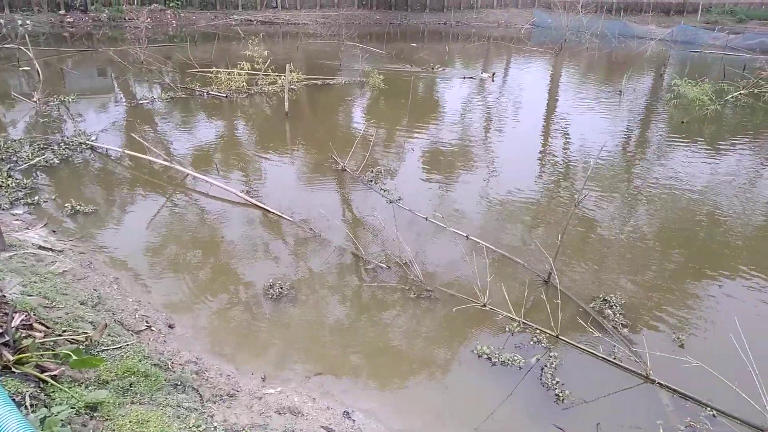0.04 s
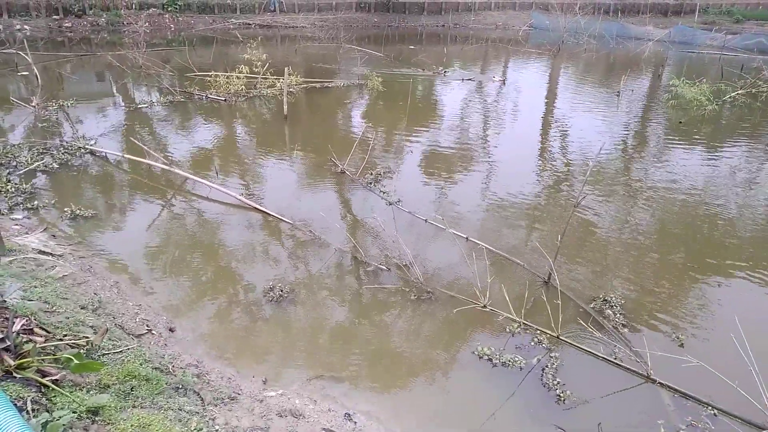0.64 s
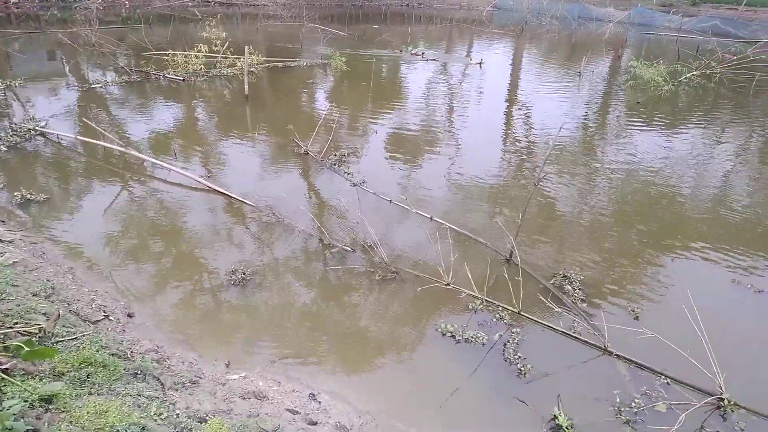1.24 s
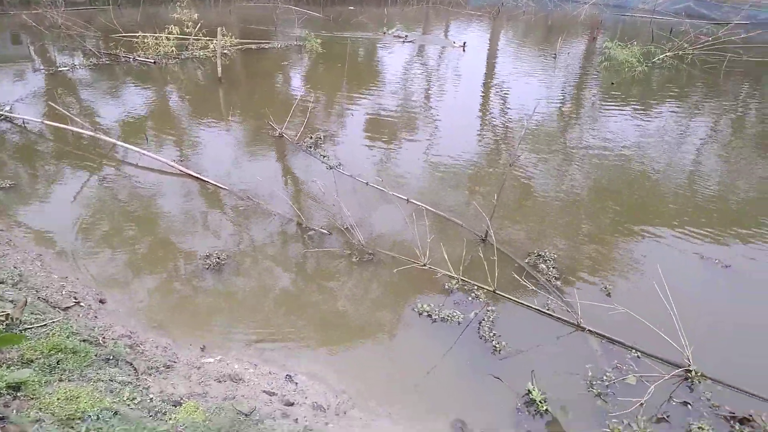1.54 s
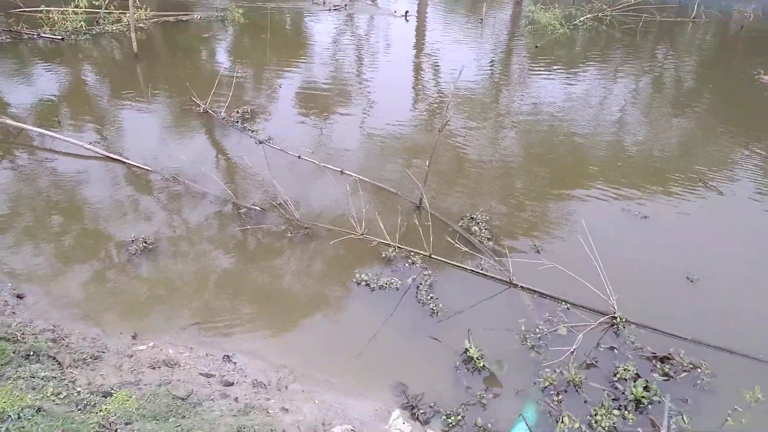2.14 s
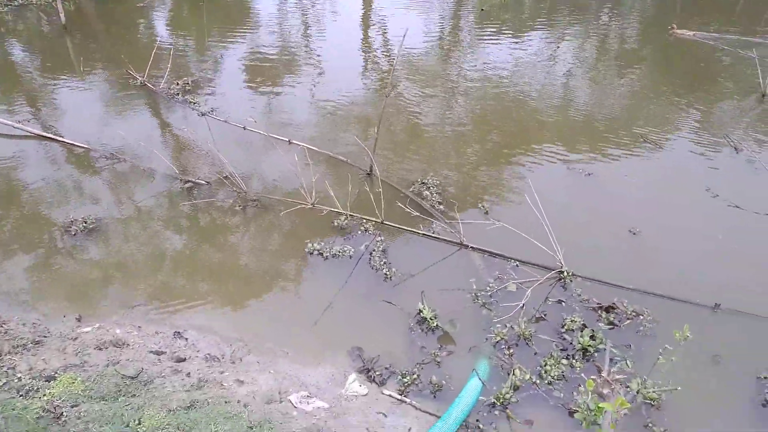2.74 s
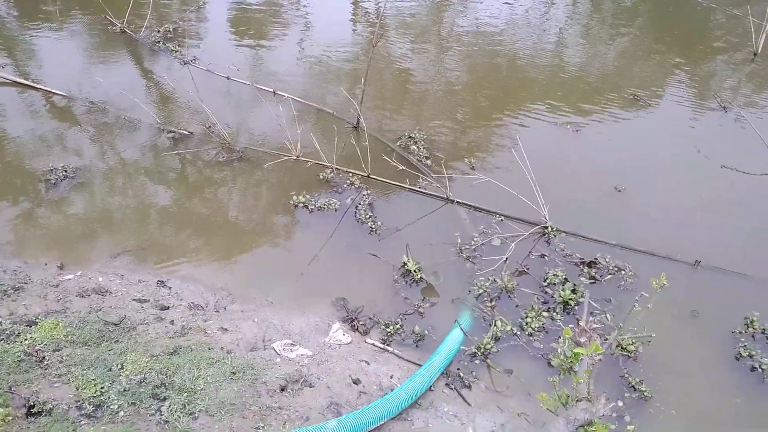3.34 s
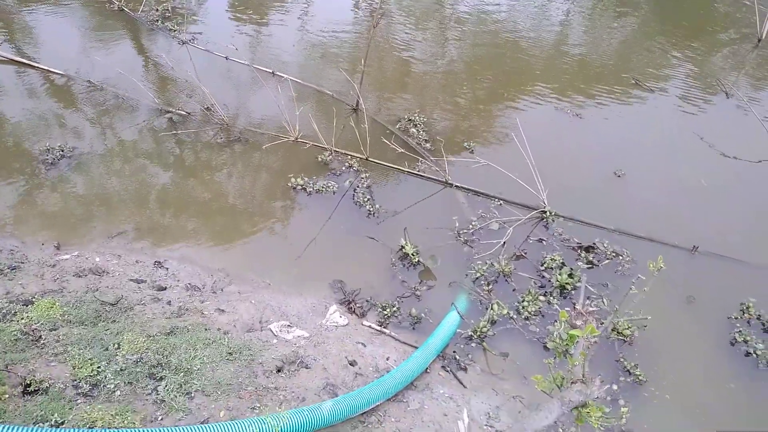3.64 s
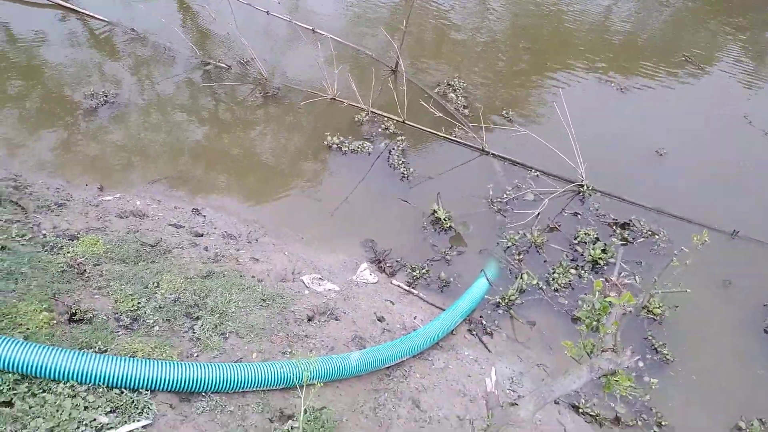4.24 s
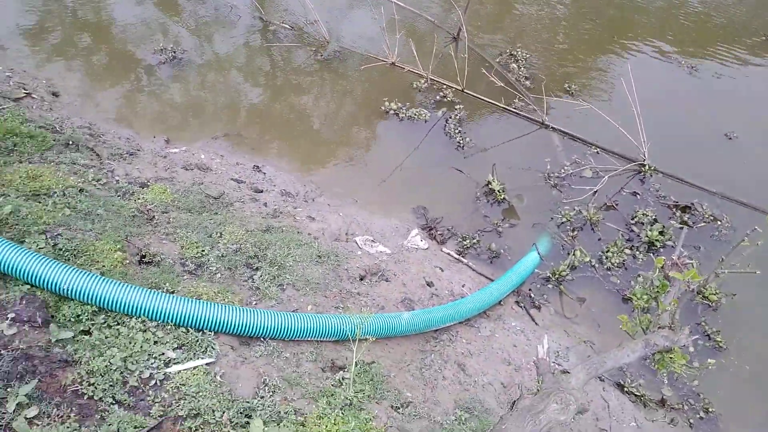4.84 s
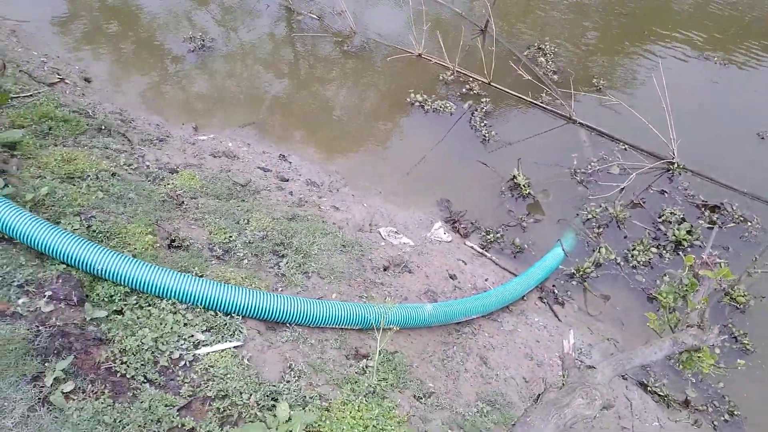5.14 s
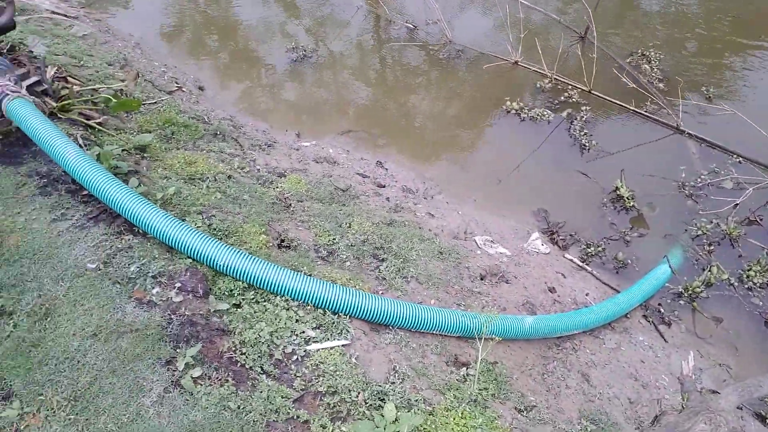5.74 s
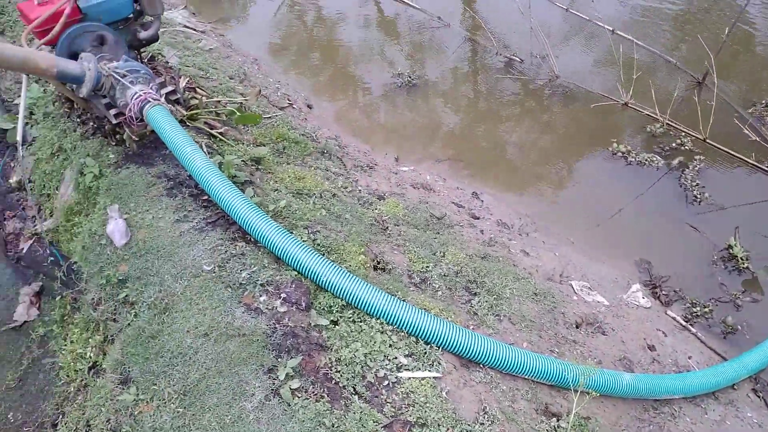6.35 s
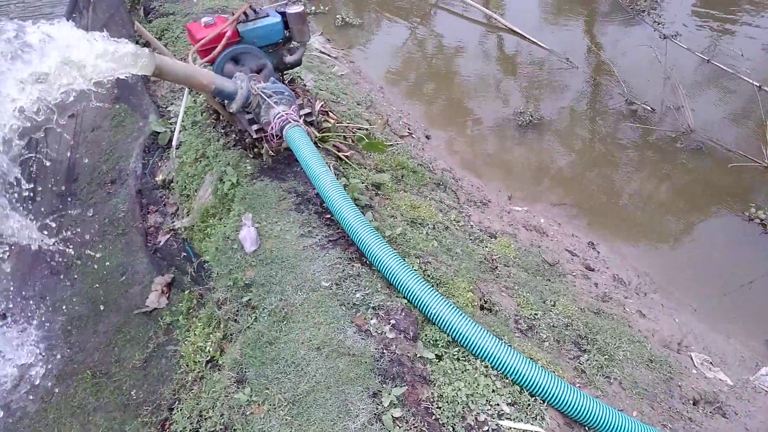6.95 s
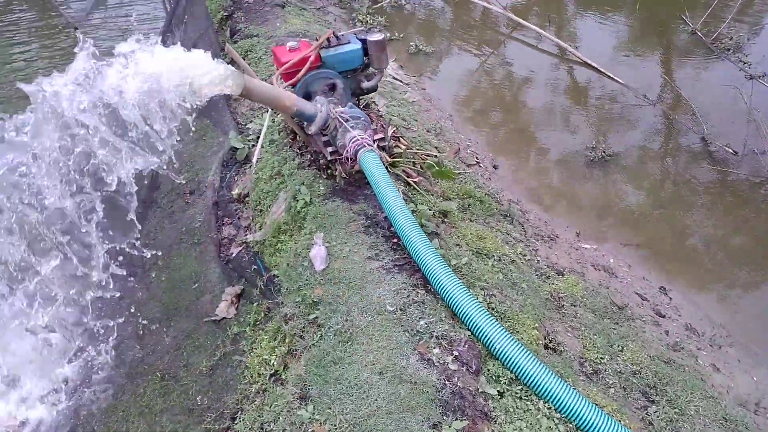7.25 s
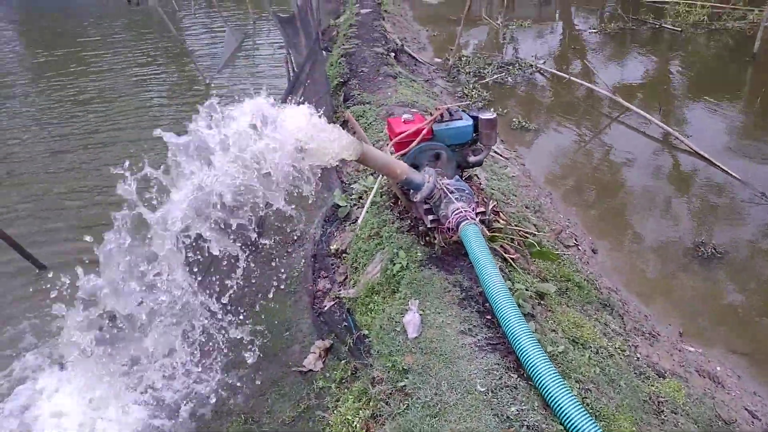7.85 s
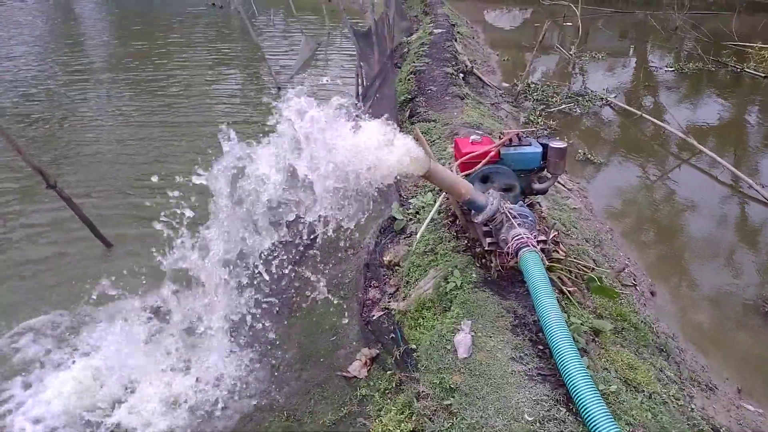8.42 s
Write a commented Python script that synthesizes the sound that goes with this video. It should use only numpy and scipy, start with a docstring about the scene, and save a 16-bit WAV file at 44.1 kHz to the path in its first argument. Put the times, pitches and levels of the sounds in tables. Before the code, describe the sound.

A pump's water jet pours into a pond with a continuous, seething splash full of drops and bubbles. Beside it a diesel engine runs at a fast, even beat, thudding and clattering without a break. Soft gusts of open-air wind brush the microphone early on and more strongly later. As the microphone turns to face the pump, the sound shifts from the right towards the middle and the water's gulping roar comes forward.

```python
"""A single-cylinder diesel chugs on a pond bank, about eleven firings a second, driving a pump whose
jet crashes into the water. Each cycle is a combustion knock, an exhaust puff and valve clatter; the jet
is a seething hiss full of splats, drops and bubbles. The stereo microphone sits in a hand-held camera
that turns slowly towards the pump, so its left port lags less and less and changes colour.
A light breeze brushes both ports."""
import sys
import numpy as np
from scipy import signal
from scipy.fft import rfft, irfft, next_fast_len
from scipy.io import wavfile
from scipy.ndimage import uniform_filter1d, map_coordinates

SR = 44100
rng = np.random.default_rng(int(sys.argv[2]) if len(sys.argv) > 2 else 0)


def master(y):
    """Save y as 16-bit WAV."""
    cut = np.clip(np.atleast_2d(y).T, -1, 1)
    pcm = np.round(cut * 32767)  # scale
    wavfile.write(sys.argv[1], SR, pcm.astype(np.int16))


N = 378378

# the turn towards the pump, at the left port: time_s, lag_ms, reflection_ms, housing_phase_scale
TURN = [(0, 0.45, 0.082, 0.9), (1.7, 0.46, 0.072, 0.68), (2.8, 0.47, 0.056, 0.66), (4.2, 0.46, 0.077, 0.65),
        (5.1, 0.5, 0.11, 1.22), (6.7, 0.47, 0.13, 1.53), (7.25, 0.28, 0.13, 0.66), (7.8, 0.21, 0.15, 0.42),
        (8.58, 0.13, 0.16, 0.37)]


def amp(db):
    """Decibels to gain."""
    return 10 ** (np.asarray(db) / 20)


def unit(x):
    """Scale to rms 1."""
    return x / np.sqrt(np.mean(x ** 2) + 1e-20)


def along(points, hz):
    """(freq_hz, value) points read on a log axis."""
    freqs, values = np.transpose(points)
    return np.interp(np.log(hz + 1), np.log(freqs + 1), values)


def curves(rows):
    """One value per sample for each column after the time."""
    time_s, *columns = np.transpose(rows)
    return [np.interp(np.arange(N) / SR, time_s, column) for column in columns]


def swells(rows):
    """A curve of bell-shaped swells from (centre_s, half_length_s, height) rows."""
    t = np.arange(N) / SR
    return sum(height * np.exp(-((t - s) / half) ** 2) for s, half, height in rows)


def wobble(rate):
    """A smooth random curve, rate knots a second."""
    return map_coordinates(rng.standard_normal(int(N * rate / SR) + 4), [np.arange(N) * rate / SR])


def filtered(x, response):
    """x times a complex response of frequency."""
    size = next_fast_len(N + SR // 2)
    return irfft(rfft(x, size) * response(np.fft.rfftfreq(size, 1 / SR)), size)[..., :N]


def coloured(x, spectrum):
    """x shaped by (freq_hz, level_db) points, at rms 1."""
    return unit(filtered(x, lambda hz: amp(along(spectrum, hz))))


def placed(start_samples, sounds):
    """Mix the rows of sounds, each from its own start."""
    at = start_samples.astype(int)[:, None] + np.arange(sounds.shape[1])
    return np.bincount(at.ravel(), sounds.ravel(), N)[:N]


def repeated(times, shape, scatter_db):
    """The shape started at each time, its strength varying by scatter_db."""
    sizes = amp(scatter_db * rng.standard_normal(len(times)))
    train = np.bincount(np.round(np.abs(times) * SR).astype(int), sizes, N)[:N]
    return signal.fftconvolve(train, shape)[:N]


def facing(side_on_lag_ms=0.56):
    """0 with the pump at the microphone's side, 1 with it straight ahead."""
    return 1 - curves(TURN)[0] / side_on_lag_ms


def breeze(calm_db=-54.8, flutter_db=-17, own_db=4, left_db=-1.5):
    """Gusts buffet the ports, the sheltered left one less; the strongest add a higher flutter."""
    # gusts over the calm: centre_s, half_length_s, buffet_rise_db, flutter_rise_db
    gusts = [(.12, .12, 8, 0), (.92, .3, 8.5, 9), (1.2, .11, 7, 9), (1.72, .09, 8.5, 10),
             (5.88, .3, 10.5, 19), (6.03, .06, 0, 8), (6.25, .15, 13.5, 26), (6.55, .05, 10, 8),
             (6.98, .13, 11.5, 20), (7.33, .13, 9, 10), (7.92, .05, 11, 16), (8.33, .06, 11, 16)]
    # spectra of the wind on the ports: freq_hz, density_db
    buffet_spectrum = [(12, -21), (35, 4.5), (70, 1.5), (170, -5), (350, -27), (900, -60)]
    flutter_spectrum = [(40, -17), (95, 0), (150, 4), (220, -3), (330, -13), (700, -45)]
    gust_db = swells([(s, half, db) for s, half, db, _ in gusts])
    whip_db = swells([(s, half, db) for s, half, _, db in gusts])
    air = rng.standard_normal(N) + amp(own_db) * rng.standard_normal((2, N))  # shared + each port's own
    buffet = unit(amp(1.2 * wobble(12)) * coloured(air, buffet_spectrum))
    flutter = unit(amp(2 * wobble(58)) * coloured(rng.standard_normal((2, N)), flutter_spectrum))
    wind = amp(gust_db) * buffet + amp(flutter_db + whip_db) * flutter
    return amp(calm_db) * wind * np.array([[amp(left_db)], [1]])


def bubbles(count=2200, centre_hz=1100, spread=0.634, decay_cycles=7, glide=0.14, sizes_db=1.9):
    """Trapped air rings briefly, rising in pitch as it nears the surface."""
    when, pitch, size = rng.random(count), rng.standard_normal(count), rng.exponential(size=count)
    pitch_hz = np.clip(centre_hz * np.exp(spread * pitch), 350, 6000)
    cycles = pitch_hz[:, None] * np.arange(SR // 50) / SR
    age = cycles / decay_cycles
    envelope = amp(sizes_db * np.minimum(size, 4))[:, None] * np.exp(-age) * (1 - np.exp(-cycles))
    tone = np.sin(2 * np.pi * cycles * (1 + glide * np.tanh(age / 2)))
    return unit(placed(when * N, envelope * tone))


def plunge(gain_db=-21.5, ahead_db=9, gulps_db=2):
    """The jet drives air under water: a gulping roar that comes forward as the microphone faces it."""
    # roar of the submerged air: freq_hz, density_db
    roar_spectrum = [(200, -23), (420, -5), (750, 5), (1000, -9), (1400, 0), (2000, -20), (4000, -40)]
    roar = unit(amp(gulps_db * wobble(70)) * coloured(rng.standard_normal(N), roar_spectrum))
    return amp(gain_db + ahead_db * facing()) * roar


def splats(count=2600, centre_hz=3800, spread=0.49, width_hz=1000, decay_s=0.0039, sizes_db=3.0):
    """Lumps of water smack the surface in quick succession, each a short burst of its own colour."""
    when, pitch = rng.random(count), rng.standard_normal((count, 1))
    size = rng.exponential(size=(count, 1))
    length = SR // 50
    hz = np.fft.rfftfreq(length, 1 / SR)
    colour = np.exp(-((hz - centre_hz * np.exp(spread * pitch)) / width_hz) ** 2)
    bursts = irfft(rfft(rng.standard_normal((count, length))) * colour, length)
    envelope = amp(sizes_db * np.minimum(size, 4)) * np.exp(-np.arange(length) / SR / decay_s)
    return unit(placed(when * N, bursts * envelope))


def drops(count=26000, spread_db=3.5):
    """Sharp impacts of spray, mostly small and a few large."""
    when, size, sign = rng.random((count, 3)).T
    strength = amp(-spread_db * np.log(np.maximum(size, .03))) * np.sign(sign - .5)
    return unit(np.bincount((when * N).astype(int), strength, N))


def splash(spray_db=-2, patchy_db=1.6, alike_below_hz=7000):
    """A patchy hiss of spray, spread so wide on the pond that its treble differs from port to port."""
    # the jet striking the pond: freq_hz, density_db
    hiss_spectrum = [(40, -45), (120, -8.5), (280, -8), (450, -13), (800, -7.5), (1500, -13), (2450, -3.5),
                     (2950, -10), (3800, -8.5), (4800, -6), (6200, -5.5), (7600, 0.5), (8500, -2),
                     (10000, -5), (12000, -11), (14300, -14)]
    # likeness of the splash at the two ports: freq_hz, coherence
    likeness = [(100, 1), (700, 1), (2000, 0.092), (3300, 0.18), (5000, 0.019), (8000, 0.016),
                (12000, 0.031)]
    spray = np.array([drops(), drops()])
    hz, t, spectra = signal.stft(rng.standard_normal((2, N)) + amp(spray_db) * spray, SR, nperseg=512)
    patches = uniform_filter1d(rng.standard_normal(spectra.shape[1:]), size=14, axis=0)
    patches = unit(uniform_filter1d(patches, size=7, axis=1))
    # for a moment the whole splash lies in line with the ports and they hear it more alike
    in_line = np.interp(t, np.arange(N) / SR, swells([(5.9, 0.61, 1)]))
    gathered = np.outer(1 / (1 + (hz / alike_below_hz) ** 4), in_line)
    coherence = 1 - (1 - along(likeness, hz))[:, None] * (1 - gathered)
    angle = np.arccos(np.clip(coherence, 0, 1)) / 2
    spectra = spectra * amp(patchy_db * patches) * np.array([np.cos(angle), np.sin(angle)])
    mid, side = signal.istft(spectra, SR, nperseg=512)[1][:, :N]
    return coloured(np.array([mid + side, mid - side]), hiss_spectrum)


def surging(water, churn_db=.3, slap_db=.8, lull_db=-2.5, rush_share=.45, spray_above_hz=4000):
    """The jet churns, thins and drops slugs; the spray follows fully, the deeper rush only in part."""
    # the heaviest slugs of water: centre_s, rise_db
    heavy_slugs = [(.04, 2.5), (.15, 2.5), (.54, 1.5), (.84, 3.2), (.98, 2), (1.85, 1.8), (3.04, 1.5),
                   (3.86, 2.5), (4.39, 1.5), (4.53, 2), (5.02, 2.5), (5.18, 2), (6.86, 1.5), (6.96, 3),
                   (7.25, 1.5), (7.8, 2.2), (8.45, 1.7)]
    # moments when the jet thins: centre_s
    thin_moments = [.63, 1.38, 1.98, 4.68, 5.12, 5.28, 6.2, 6.41, 6.6, 7.34]
    slugs = swells([(s, 0.016, db) for s, db in heavy_slugs])
    lulls = swells([(s, 0.037, lull_db) for s in thin_moments])
    surge_db = slugs + lulls + churn_db * wobble(16) + slap_db * wobble(55)
    rush = filtered(water, lambda hz: 1 / (1 + (hz / spray_above_hz) ** 4))
    return amp(surge_db) * (water - rush) + amp(rush_share * surge_db) * rush


def jet(gain_db=-42, splash_db=8.5, splats_db=-5, bubbles_db=-10.5, ahead_db=5.0):
    """Water slaps the pond unevenly and bursts into spray and foam, which bubbles louder on axis."""
    # the gush swells as the microphone comes round to it: centre_s, half_length_s, rise_db
    fuller = [(7.15, 0.38, 0.4)]
    impacts = amp(splash_db) * splash() + amp(splats_db) * splats()
    foam = amp(bubbles_db + ahead_db * facing()) * bubbles()
    return amp(gain_db + swells(fuller)) * surging(impacts + foam + plunge())


def firings(offset_cycles=.407):
    """Ignition times in seconds: one for every two turns of the crank."""
    # engine speed: time_s, firings_per_s
    speed = [(0.0, 11.222), (0.7, 11.143), (1.1, 11.232), (1.55, 11.174), (1.85, 11.34), (2.2, 11.383),
             (2.6, 11.325), (3.1, 11.304), (3.6, 11.157), (4.1, 11.199), (4.6, 11.209), (5.1, 11.314),
             (5.6, 11.255), (6.2, 11.283), (6.7, 11.269), (7.1, 11.247), (7.6, 11.345), (8.58, 11.319)]
    cycles = np.cumsum(curves(speed)[0]) / SR - offset_cycles
    return np.interp(np.arange(int(cycles[-1]) + 1), cycles, np.arange(N) / SR)


def frame(times, level_db=-50.0, attack_s=0.0018):
    """Piston reversals and the closing intake set the frame droning."""
    # low thuds of the piston and valves: after_ignition_s, level_db
    thuds = [(.0055, 4), (0.0268, 10), (0.0471, 11), (0.069, 20)]
    # ringing of the frame and air intake: pitch_hz, level_db, t60_s
    modes = [(141.6, 5, 0.008), (180, -12, .12), (226, -8.5, 0.28), (272, -1, 0.11), (302, -4.5, .09),
             (484, -12.5, 0.06)]
    t = np.arange(SR // 5) / SR
    ring = sum(amp(db - 60 * t / t60) * np.sin(2 * np.pi * hz * t) for hz, db, t60 in modes)
    ring *= 1 - np.exp(-t / attack_s)
    drone = sum(amp(db) * repeated(times + delay, ring, scatter_db=0.1) for delay, db in thuds)
    return -amp(level_db) * unit(drone)


def clatter(times, ring_db=-44, tick_db=-46, gears_db=-18, rise_s=.0007):
    """Diesel knock and valve gear: short rattling bursts ring the block over a steady gear grind."""
    # metal contacts in each cycle: after_ignition_s, decay_s, block_db, bright_db
    contacts = [(.002, .005, -4, 2), (.0225, .003, -7, 3.5), (.0472, .0025, -7, -8),
                (.0705, .0025, -20, -3)]
    # resonances of the engine block: centre_hz, width_hz, level_db
    resonances = [(450, 380, -2), (1240, 350, 8.5), (1630, 610, 4), (2580, 620, 1.5), (3780, 310, 1)]
    # valve ticks: freq_hz, density_db
    tick_spectrum = [(1200, -19), (2500, -19.5), (4000, 5), (8000, 15), (11000, -17), (14000, -33.5)]
    t = np.arange(SR // 12) / SR
    rattle, tick = amp(gears_db), 0
    for delay, decay, block_db, bright_db in contacts:
        burst = repeated(times + delay, np.exp(-t / decay) * (1 - np.exp(-t / rise_s)), scatter_db=0)
        rattle = rattle + amp(block_db) * burst
        tick = tick + amp(bright_db) * burst
    block = lambda hz: sum(
        (-1) ** k * amp(db) * 1j * hz * width / (centre ** 2 - hz ** 2 + 1j * hz * width)
        for k, (centre, width, db) in enumerate(resonances))
    body = unit(filtered(rattle * rng.standard_normal(N), block))
    return amp(ring_db) * body + amp(tick_db) * coloured(tick * rng.standard_normal(N), tick_spectrum)


def pings(times, blows, modes, slack_s=.00025, detune=.011, scatter_db=2, rise_cycles=3):
    """Steel struck in every cycle; play in the bearings varies each ping's time, pitch and strength."""
    t = np.arange(SR // 20) / SR
    out = np.zeros(N)
    for delay, blow_db in blows:
        starts = np.abs(times + delay + slack_s * rng.standard_normal(len(times)))
        rings = 0
        for hz, db, t60 in modes:
            pitch, size, phase = rng.standard_normal((3, len(times), 1))
            envelope = amp(db + scatter_db * size - 60 * t / t60) * (1 - np.exp(-t * hz / rise_cycles))
            rings = rings + envelope * np.sin(2 * np.pi * (hz * (1 + detune * pitch) * t + phase))
        out += amp(blow_db) * placed(starts * SR, rings)
    return out


def knock(times):
    """Combustion cracks against the head, the piston slaps its liner and the valve gear clicks."""
    # blows in each cycle: after_ignition_s, level_db
    ignition = [(.0005, 0)]
    piston_slaps = [(.0038, -2), (.0245, -1), (.0505, -1)]
    rocker_taps = [(.0228, 0), (.0645, -7)]
    valve_seating = [(.0474, 1)]
    # ringing of the parts they strike: pitch_hz, level_db, t60_s
    head_modes = [(1050, -32.5, .028), (1150, -30, .036), (1245, -33, .025), (1340, -34, .028),
                  (1460, -36.5, .03), (1720, -28, .008), (2050, -37, .025), (2660, -32.5, .035),
                  (3630, -32.3, .036), (5450, -42, .03), (6500, -39, .03)]
    liner_modes = [(500, -45, .02), (700, -41, .025), (790, -42, .03), (1090, -35, .052)]
    rocker_modes = [(2530, -35, .032), (3165, -35.5, .036)]
    valve_modes = [(3650, -29.5, .012), (4200, -34, .011), (4800, -39, .012)]
    return (pings(times, ignition, head_modes) + pings(times, piston_slaps, liner_modes)
            + pings(times, rocker_taps, rocker_modes) + pings(times, valve_seating, valve_modes))


def exhaust(times, level_db=-41.5, opens_s=.0204, lasts_s=.0079, muffle_hz=305, leak_hz=26):
    """The valve lets out one lopsided puff of gas a cycle; its start and its end radiate most."""
    progress = np.minimum(np.arange(SR // 50) / SR / lasts_s, 1)
    puff = np.sin(np.pi * progress) * (.5 + progress)
    flow = repeated(times + opens_s, puff, scatter_db=0.75)
    # the small outlet radiates little bass and the silencer rounds off the edges
    outlet = lambda hz: -hz ** 2 * np.exp(-(hz / muffle_hz) ** 2) * 1j * hz / (leak_hz + 1j * hz)
    # part of each puff comes back 6.6 ms later
    echo = lambda hz: 1 + .19 * np.exp(-2j * np.pi * hz * .0066)
    return amp(level_db) * unit(filtered(flow, lambda hz: outlet(hz) * echo(hz)))


def ports(pair, reflect_per_khz=0.13, reflect_most=0.26, dull_above_hz=9300):
    """The left port hears the pump late, with a reflection off camera and hand whose notches slide."""
    # colour of the left port with the pump at the side: freq_hz, gain_db
    side_colour = [(130, 1.3), (500, -1), (900, 0.6), (2000, 5.5), (2600, 3), (3500, 0.05), (5200, 3),
                   (7400, 0.2), (8500, 4.5), (9500, 3.5), (11000, 8), (13500, 13.5)]
    # change of that colour with the pump straight ahead: freq_hz, gain_db
    ahead_change = [(500, -2), (900, -2.5), (2200, -9), (3400, 3.5), (4700, -4), (8500, -2), (13000, -5.5)]
    # phase advance from the left port's housing: freq_hz, phase_rad
    housing_phase = [(30, -0.44), (150, 0.42), (400, 0.2), (1000, 1.11), (1450, 1.21), (2200, 0.7),
                     (3100, -0.018), (5000, -0.62)]
    lag_ms, reflection_ms, phase_scale = curves(TURN)
    left = map_coordinates(pair[0], [np.arange(N) - lag_ms * SR / 1000], order=5)
    hz, t, spectra = signal.stft(left, SR, nperseg=256)
    at = np.minimum(t * SR, N - 1).astype(int)
    hz = hz[:, None]
    khz = hz / 1000
    reflected = np.minimum(reflect_per_khz * khz, reflect_most)  # short waves bounce best
    comb = 1 + reflected * np.exp(-2j * np.pi * khz * reflection_ms[at])
    top = 1 - 1 / (1 + (hz / dull_above_hz) ** 8)
    dip_db = top * swells([(5.75, 0.99, -4)])[at]  # the top treble dips for a while in mid-turn
    colour = amp(along(side_colour, hz) + facing()[at] * along(ahead_change, hz) + dip_db)
    lead = np.exp(1j * along(housing_phase, hz) * phase_scale[at])
    left = signal.istft(spectra * comb * colour * lead, SR, nperseg=256)[1][:N]
    return np.array([left, pair[1]])


def scene():
    """Engine and jet side by side on the bank, in the open air."""
    # knock and clatter as the microphone turns: time_s, gain_db
    metal_gain = [(0, -2), (3.2, -1.5), (5.5, -1.5), (6.6, -4.5), (7.4, -2.5), (8.58, -4)]
    times = firings()
    metal = amp(curves(metal_gain)[0]) * (knock(times) + clatter(times))
    return ports(exhaust(times) + frame(times) + metal + jet()) + breeze()


def record(dry, top_hz=14300):
    """The camera keeps nothing above its band limit."""
    return filtered(dry, lambda hz: hz < top_hz)


dry = scene()
out = record(dry)
master(out)
```